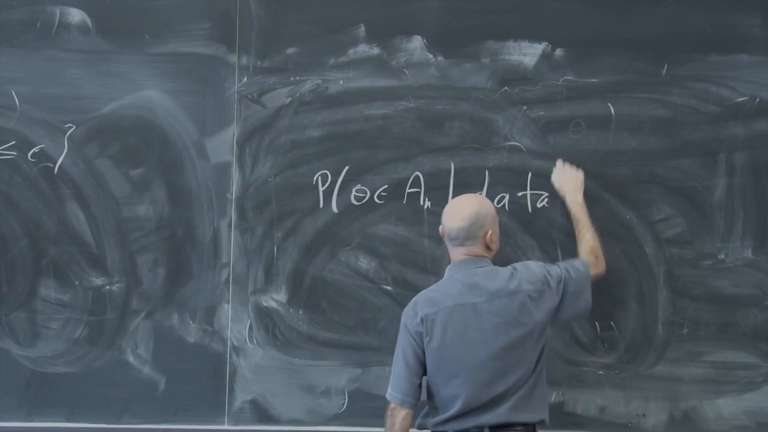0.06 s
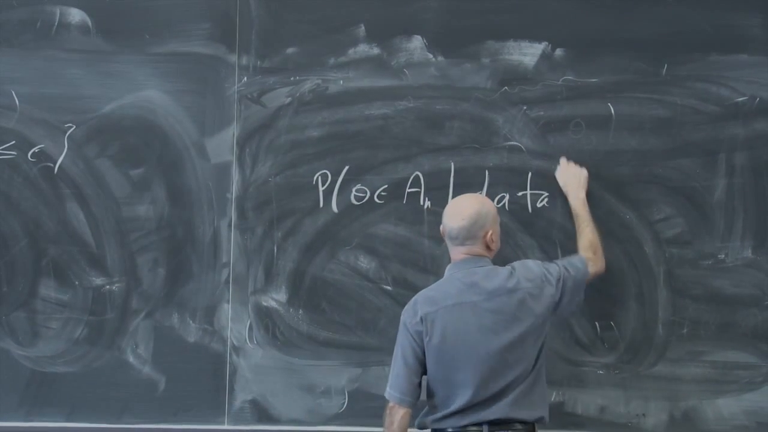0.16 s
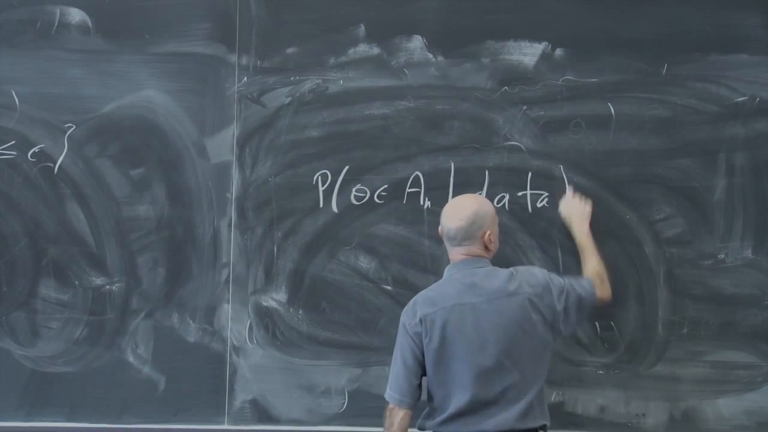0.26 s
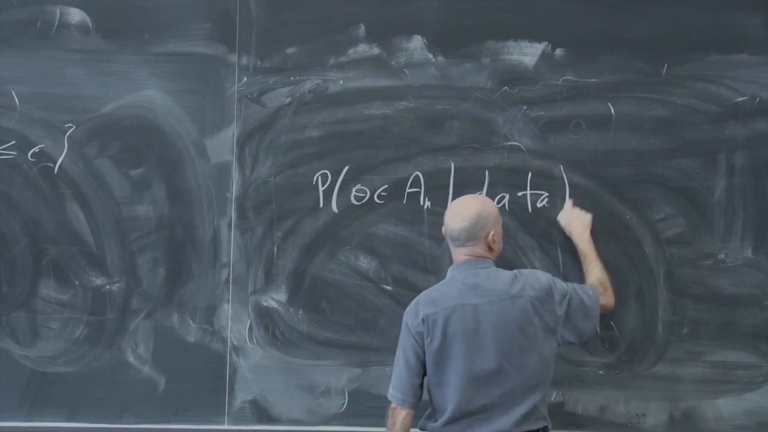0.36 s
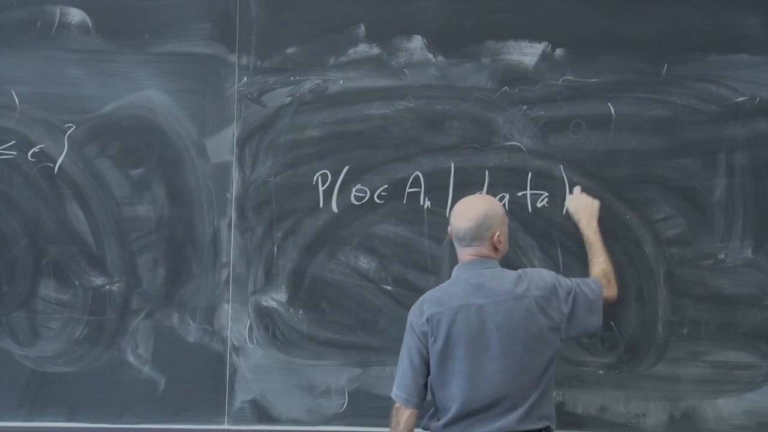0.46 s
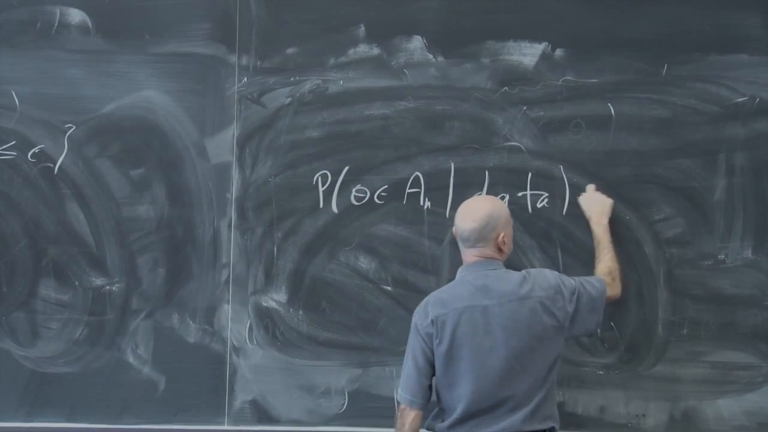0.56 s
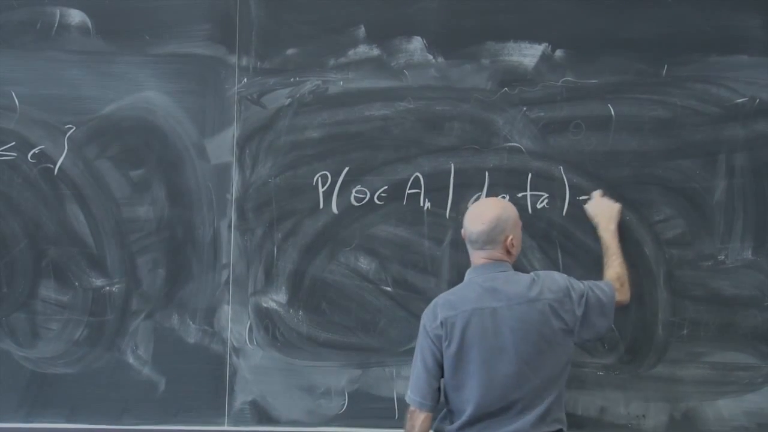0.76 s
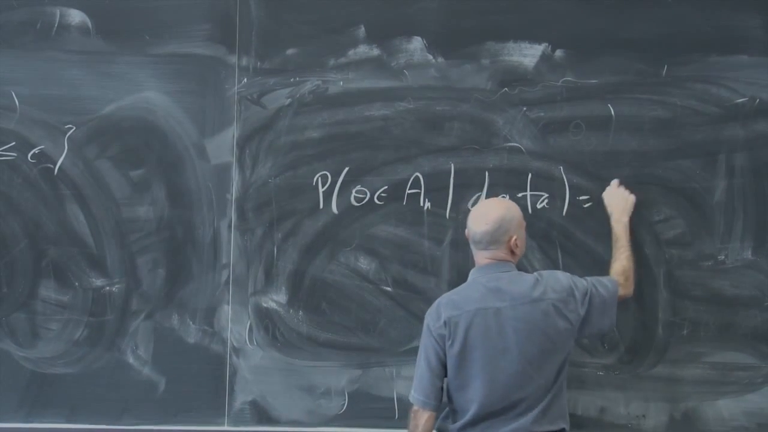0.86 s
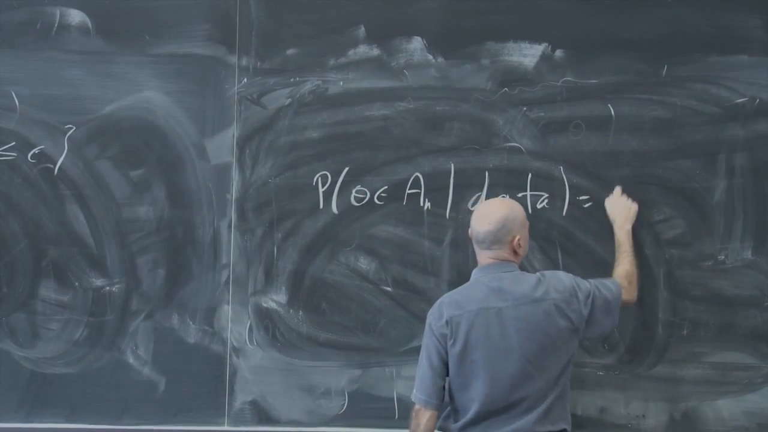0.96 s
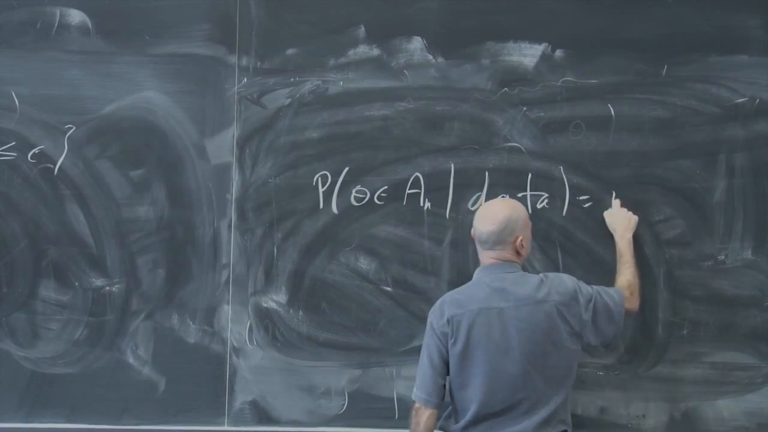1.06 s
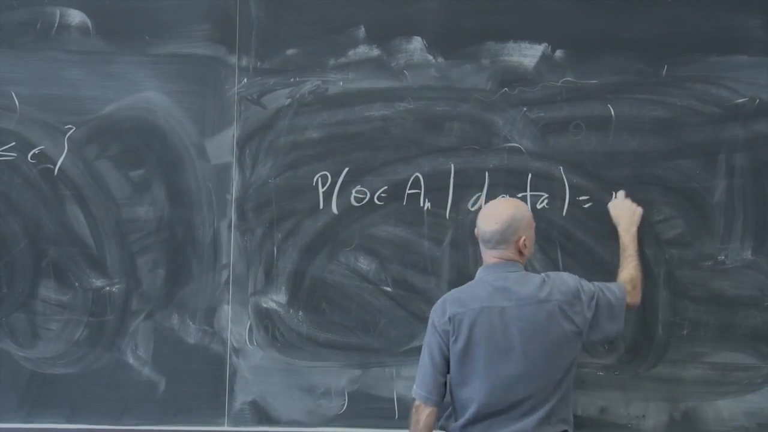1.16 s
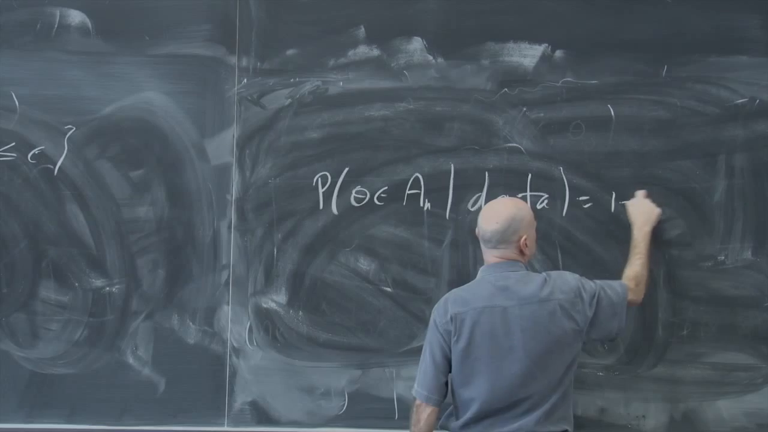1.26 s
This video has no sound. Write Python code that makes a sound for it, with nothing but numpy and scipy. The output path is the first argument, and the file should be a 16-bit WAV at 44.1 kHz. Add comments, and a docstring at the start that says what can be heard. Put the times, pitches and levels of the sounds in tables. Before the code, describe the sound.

Chalk writing on a blackboard, with sharp taps and brief gritty scrapes over low ventilation rumble.

```python
"""In a lecture room, chalk writes a few short strokes on a blackboard.
The chalk lands with a hard tap that knocks the board and makes it ring. Then the stick drags over it,
shedding tiny grains that sound gritty, and lifts off. Light ticks fall between the strokes.
The room rings on over a low ventilation rumble. One microphone hears it all, placed right of centre."""
import sys
import numpy as np
from scipy import signal
from scipy.fft import rfft, irfft, next_fast_len
from scipy.io import wavfile

SR = 44100
rng = np.random.default_rng(int(sys.argv[2]) if len(sys.argv) > 2 else 0)


def materialize(psi):
    """Save the field psi as 16-bit PCM at rate SR to the path in sys.argv[1].

    A 1-D psi becomes a single channel; in a 2-D psi each row is a channel.
    """
    bounded = np.clip(np.atleast_2d(psi).T, -1, 1)
    quanta = np.round(bounded * 32767).astype(np.int16)
    wavfile.write(sys.argv[1], SR, quanta)


N = 57330
T = np.arange(N) / SR


def chalk_taps():
    """The chalk lands and bounces, so the board knocks, rings and bends. Returns knocks and rings."""
    # One row per landing: t/s, level/dB, contact cut-off/Hz, knock f/Hz, knock width/Hz, ring/dB,
    # crack/dB, bounce delay/s, bounce/dB, thud/dB, thud f/Hz, boom/dB
    landings = [(0.2237, -10, 1960, 1150, 970, -9.5, -33, 0.0013, -9.5, -38.5, 231.6, -64),
                (0.6197, -14, 1910, 1080, 860, -10.5, -35, .00121, -3, -35.5, 272, -43.5),
                (0.7964, -10, 3220, 1070, 750, -10, -28.5, 0.003592, -6, -32.5, 258, -45),
                (1.0181, -9, 1185, 950, 1000, -14.5, -38.5, 0.0036, -16, -33.5, 276.4, -42)]
    knocks, rings = np.zeros(N), np.zeros(N)
    notes = board_ring()
    for (start, db, contact_hz, knock_hz, width_hz, ring_db,
         crack_db, bounce_s, bounce_db, thud_db, thud_hz, boom_db) in landings:
        knock = board_knock(knock_hz, width_hz)
        bounce = from_db(bounce_db) * at(bounce_s, knock)
        blow = knock + bounce + at(0.002083, frame_rattle())
        crack = from_db(crack_db) * tip_crack()
        knocks += at(start, from_db(db) * low_pass(blow, contact_hz) + crack)
        ring = from_db(db + ring_db) * low_pass(notes, contact_hz)
        thud = from_db(thud_db) * board_bend(thud_hz, rise_s=0.0044)
        boom = from_db(boom_db) * board_bend(hz=67, rise_s=0.0047)
        rings += at(start, ring + thud + boom)
    return knocks, rings


def board_knock(hz, width_hz):
    """The tip gives the board one sharp push."""
    push = from_db(20) * (T == 0)
    return resonance(resonance(push, hz, width_hz), hz, 2 * width_hz)


def board_ring():
    """The struck board rings with several notes at once; the higher ones die sooner."""
    # The board's own notes: f/Hz, level/dB
    notes = [(400, -12.5), (915, -10.5), (1088, -14), (1170, -44), (1490, -9.5), (1575, -11), (1950, -10),
             (2110, -7), (2600, -9), (3230, -9), (4020, -17), (5287, -18)]
    t60, damping_hz = 0.034, 5000
    return sum((-1) ** k * from_db(db) * np.sin(2 * np.pi * hz * T) * fade(t60 / (1 + hz / damping_hz))
               for k, (hz, db) in enumerate(notes))


def board_bend(hz, rise_s):
    """The whole board bends slowly: a low note that swells and dies within a few swings."""
    swell = T / rise_s * np.exp(np.maximum(1 - T / rise_s, -60))
    return swell * np.sin(2 * np.pi * hz * T)


def frame_rattle():
    """The frame scatters the waves in the board into a short rattle."""
    # Tone of the rattle: f/Hz, level/dB
    tone = [(150, -7), (300, 2), (600, -3.5), (1000, 0), (1800, 3.5), (3000, -21.5), (4500, -20.5),
            (8000, -21), (16000, -39)]
    burst = rng.standard_normal(N) * fade(t60=0.033)
    return from_db(1) * unit_energy(colour(burst, tone))


def tip_crack():
    """The tip cracks as it lands: a very short, bright noise."""
    # Tone of the crack: f/Hz, level/dB
    tone = [(1000, -7.5), (3400, 14.5), (4400, 1.5), (6400, -2.5), (7800, -13.5), (9500, -13.5),
            (11500, -15), (13500, -15), (16000, -13.5)]
    return rms_one(colour(rng.standard_normal(N), tone)) * fade(t60=0.0074)


def chalk_strokes():
    """As the chalk drags, its grains shake the board, make the stick rasp and hiss at the tip."""
    # One row per stroke: t/s, length/s, level/dB, point of hardest pressure (0 to 1), dust hiss/dB
    strokes = [(-0.06, 0.11, -66, 0.24, -73), (0.247, .196, -59, 0.63, -65),
               (0.622, .095, -64.5, 0.36, -72), (0.802, 0.09, -60, 0.62, -79),
               (1.034, 0.12, -62, 0.63, -68.5)]
    # Notes of the dragged stick: f/Hz, width/Hz, level/dB
    stick_notes = [(1902, 67, 4), (2500, 160, -1), (3280, 107, -2.5), (4000, 220, -13)]
    # Tone of the scraped board: f/Hz, level/dB
    scrape_tone = [(200, -8), (600, -9), (1200, 2), (1900, 3), (2250, -2.5), (2700, 2), (3500, -10.5),
                   (5000, -9), (7500, -24), (16000, -19.5)]
    # Tone of the dust hiss: f/Hz, level/dB
    dust_tone = [(3000, -12), (5000, -8), (8000, 1.5), (11000, 0.5), (13000, 5.5), (15000, -5), (16000, 6)]
    drag_gain, dust_gain = np.zeros(N), np.zeros(N)
    for start, length, db, hardest, dust_db in strokes:
        progress = (T - start) / length
        # Powers below 1 round the arch. The hiss begins later, once the stick is sliding.
        drag_gain += from_db(db) * pressure_arch(progress, 0, hardest) ** 0.85
        dust_gain += from_db(dust_db) * pressure_arch(progress, 0.13, hardest) ** 0.74
    grains = chalk_grains()
    rasp = rms_one(sum(from_db(db) * resonance(grains, hz, width) for hz, width, db in stick_notes))
    scrape = rms_one(colour(chalk_grains(), scrape_tone))
    hiss = rms_one(colour(grains, dust_tone))
    return drag_gain * (scrape + from_db(-6) * rasp) + dust_gain * hiss


def pressure_arch(progress, start, top):
    """Pressure rises from start to top, then falls to the end; 0 to 1 spans the stroke."""
    return np.sin(np.pi / 2 * np.interp(progress, [start, top, 1], [0, 1, 0]))


def chalk_grains(per_second=7400, spread_db=3.5):
    """Grains break off at random, each a tiny click of its own size."""
    sizes = from_db(spread_db * np.minimum(rng.exponential(1, N), 4))
    signs = rng.choice([-1, 1], N)
    return sizes * signs * (rng.random(N) < per_second / SR)


def chalk_ticks():
    """The tip crackles lightly between strokes."""
    # One row per tick: t/s, level before filtering/dB, centre f/Hz
    ticks = [(0.48, -60.5, 4900), (0.5263, -47.5, 3730), (0.9347, -49, 9500)]
    sound = np.zeros(N)
    for start, db, hz in ticks:
        burst = from_db(db) * rng.standard_normal(N) * fade(t60=0.0086)
        width_hz = 0.78 * hz
        sound += at(start, resonance(resonance(burst, hz, width_hz), hz, width_hz))
    return sound


def room_echo(x):
    """The room smears the sound into a smooth tail; the treble lasts a little longer than the bass."""
    # Tone of the room: f/Hz, gain/dB
    tone = [(60, 14), (270, 7), (420, 6.5), (700, -1.5), (1000, -4), (1400, -6.5), (1900, -1.5), (3000, -5),
            (6000, -12.5), (16000, -10)]
    noise = rng.standard_normal(N)
    lows = low_pass(noise, hz=2350)
    highs = noise - lows
    build_up = 1 - np.exp(-T / 0.0035)
    tail = unit_energy((lows * fade(t60=0.46) + highs * fade(t60=0.6)) * build_up)
    return from_db(-9.5) * signal.fftconvolve(x, colour(tail, tone))[:N]


def ventilation():
    """The ventilation rumbles steadily, with a faint microphone hiss on top."""
    # Tone of the rumble and hiss: f/Hz, level/dB
    tone = [(15, -3.5), (30, -0.5), (48, -22.5), (80, -3), (100, -4), (120, 0), (155, -9), (280, -6.5),
            (400, -14.5), (700, -22.5), (1500, -28), (3000, -35.5), (6000, -39), (13000, -43), (16000, -54)]
    return from_db(-61.5) * rms_one(colour(rng.standard_normal(N), tone))


def from_db(db):
    """Turn decibels into a number to multiply by."""
    return 10 ** (np.asarray(db) / 20)


def rms_one(x):
    """Scale a sound so its average strength (rms) is 1."""
    return x / np.sqrt(np.mean(x ** 2) + 1e-20)


def unit_energy(x):
    """Scale a sound so its squared samples add up to 1."""
    return rms_one(x) / np.sqrt(N)


def at(s, x):
    """Start a sound s seconds in."""
    return np.concatenate([np.zeros(max(int(s * SR), 0)), x])[:N]


def fade(t60):
    """Die away by 60 dB every t60 seconds."""
    return from_db(-np.minimum(60 * T / t60, 300))


def colour(x, points):
    """Shape a sound's tone along a curve of (f/Hz, gain/dB) points."""
    size = 2 * next_fast_len(N)
    hz, db = np.transpose(points)
    bins = np.maximum(np.arange(size // 2 + 1) * SR / size, 1)
    gains = from_db(np.interp(np.log(bins), np.log(hz), db))
    cepstrum = irfft(np.log(gains))
    # Fold it in half so the filter never sounds before its input.
    cepstrum[1:size // 2] *= 2
    cepstrum[size // 2 + 1:] = 0
    return irfft(rfft(x, size) * np.exp(rfft(cepstrum)))[:N]


def resonance(x, hz, width_hz):
    """Let through a band of pitches around hz."""
    r = np.exp(-np.pi * width_hz / SR)
    feedback = [1, -2 * r * np.cos(2 * np.pi * hz / SR), r * r]
    return signal.lfilter(np.array([1, 0, -1]) * (1 - r * r) / 2, feedback, x + 1e-18)


def low_pass(x, hz):
    """Soften everything above hz."""
    return signal.sosfilt(signal.butter(2, hz, fs=SR, output="sos"), x + 1e-18)


def scene():
    """Mix chalk, board, room and ventilation, louder on the right."""
    knocks, rings = chalk_taps()
    chalk = knocks + chalk_strokes() + chalk_ticks()
    air = ventilation()
    echo = room_echo(chalk + from_db(-13) * rings)
    return (chalk + rings + echo + air) * from_db([[-3], [3]])  # left, right


def record(dry):
    """Cut off the very highest treble steeply."""
    cutoff_hz = 15800
    return signal.sosfilt(signal.ellip(10, .1, 70, cutoff_hz, fs=SR, output="sos"), dry)


dry = scene()
out = record(dry)
materialize(out)
```